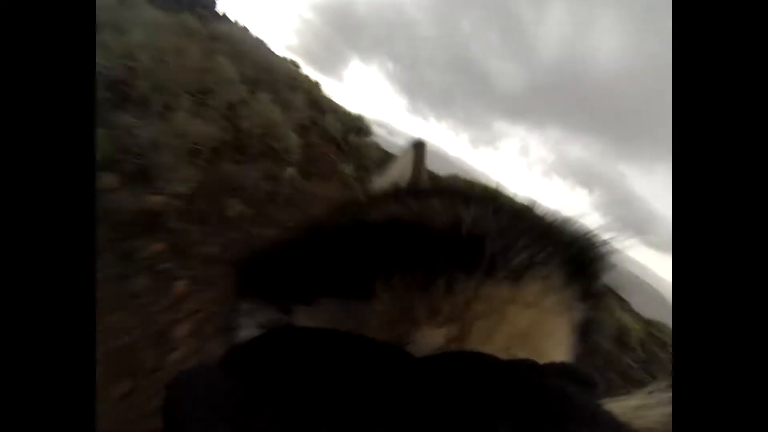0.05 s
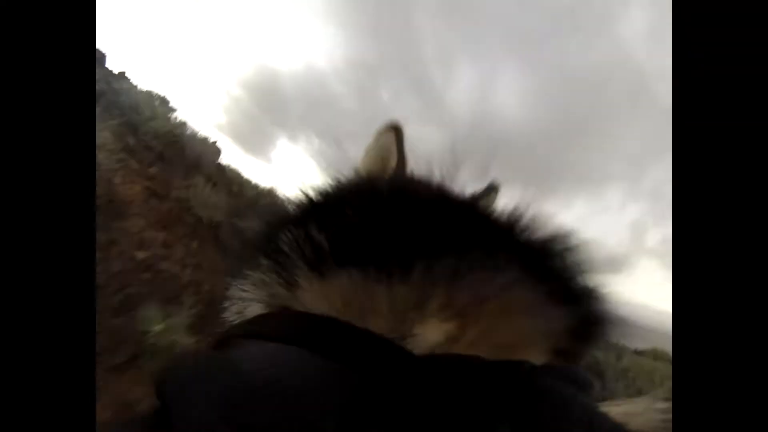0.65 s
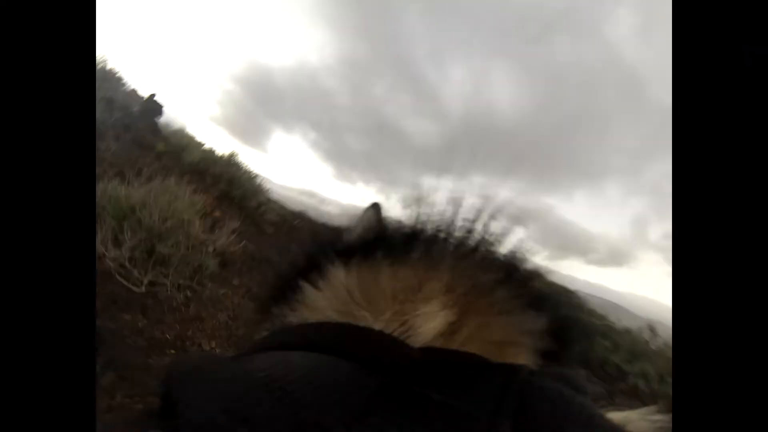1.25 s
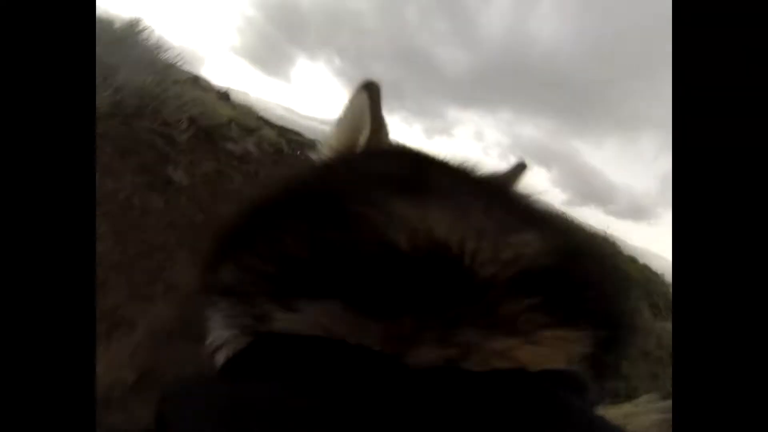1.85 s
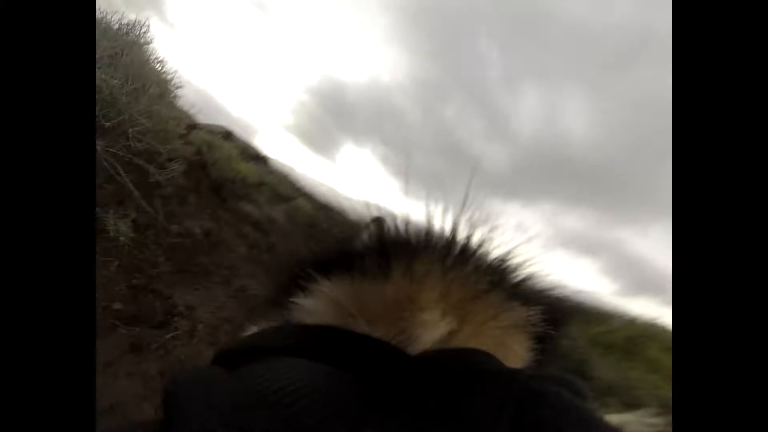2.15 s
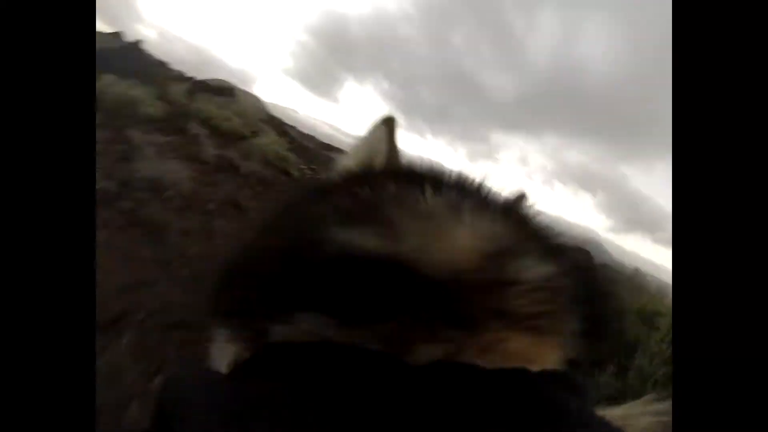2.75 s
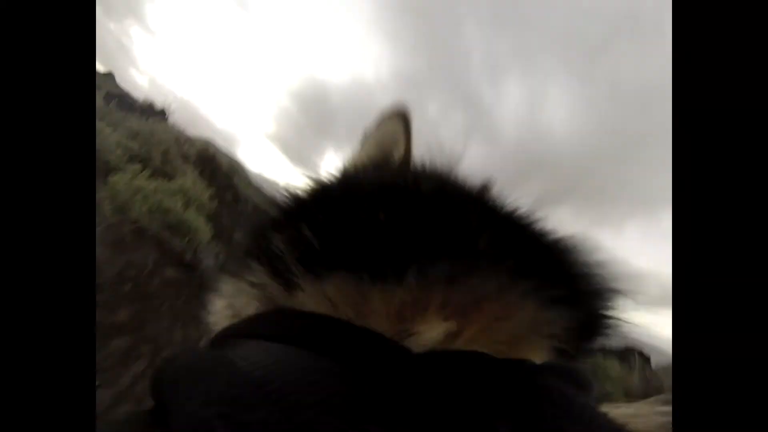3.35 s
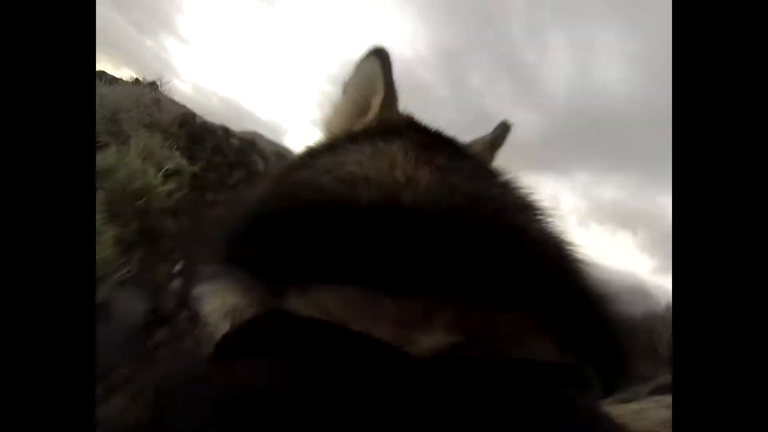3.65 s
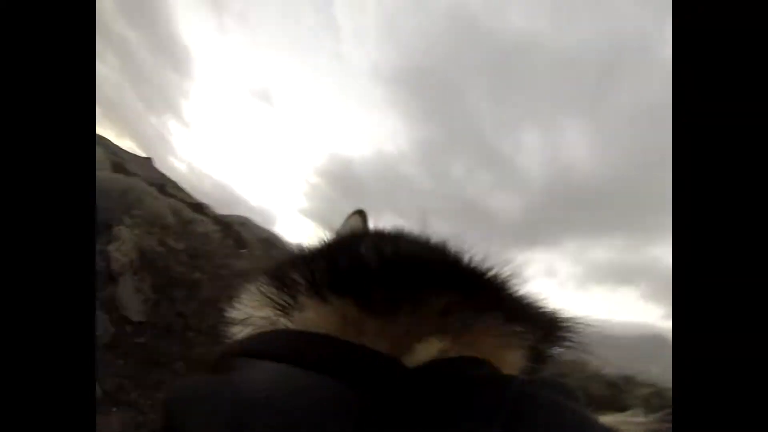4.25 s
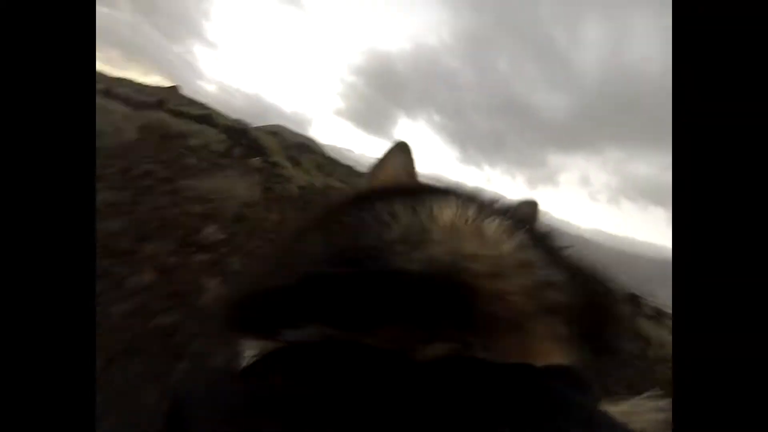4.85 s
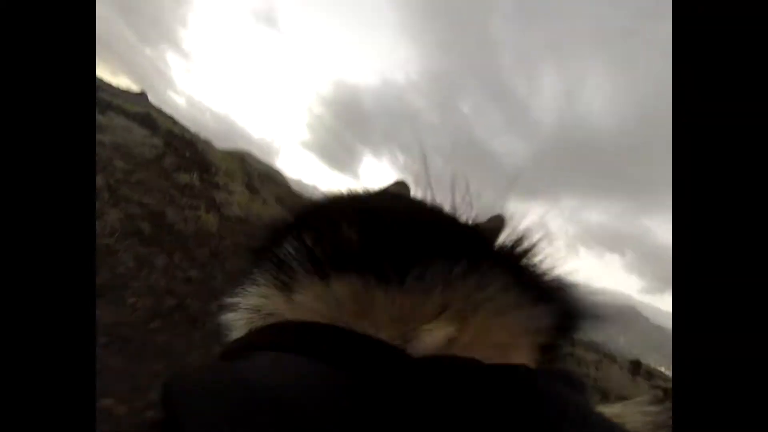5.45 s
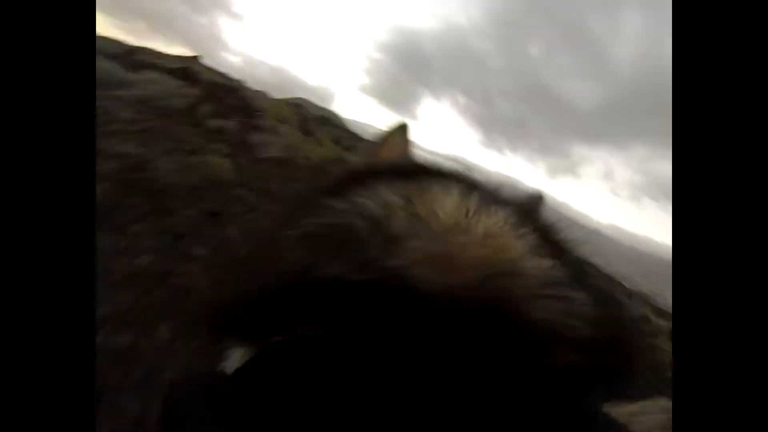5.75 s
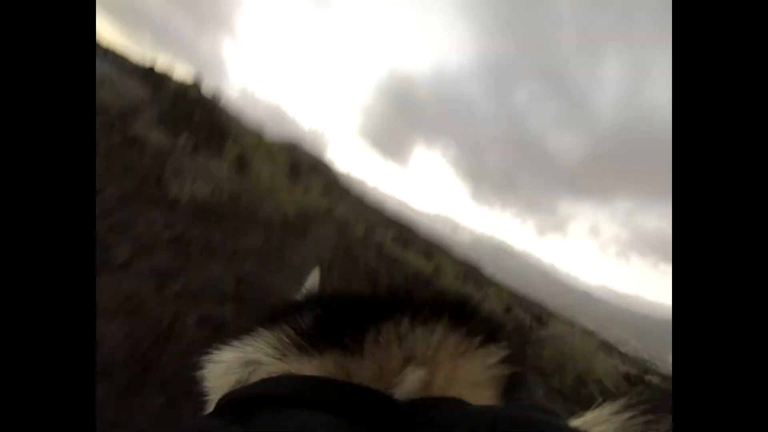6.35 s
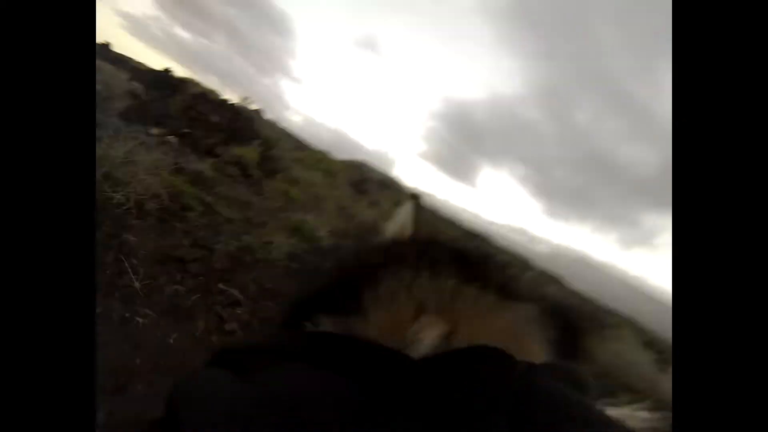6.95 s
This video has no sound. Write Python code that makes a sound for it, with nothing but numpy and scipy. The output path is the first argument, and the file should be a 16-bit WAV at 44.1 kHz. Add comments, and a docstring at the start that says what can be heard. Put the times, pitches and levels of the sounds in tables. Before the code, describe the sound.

Close, irregular plastic knocks and dull step thumps as a dog walks wearing a camera, its metal tag tinkling faintly over rumbling air.

```python
"""A dog walks a hill trail with a small camera strapped to its back, in a low rumble and a soft hiss.
From the first moment fur and straps rub, and the plastic case knocks and rattles right at the microphone.
A metal tag tinkles, steps thump through the harness, and near 1 s a hard blow rings a steel buckle.
Near 4 s the hardest knock overloads the microphone and the case scrapes along its mount.
Just after 6 s quick tugs snap a strap taut, and the walk goes on with lighter knocks."""
import sys
import numpy as np
from scipy import signal
from scipy.fft import rfft, irfft, next_fast_len
from scipy.io import wavfile
from scipy.ndimage import uniform_filter1d

SR = 44100
rng = np.random.default_rng(int(sys.argv[2]) if len(sys.argv) > 2 else 0)


def store_pcm(level_fs):
    """Save levels as 16-bit WAV."""
    pcm = np.round(np.clip(level_fs, -1, 1) * 32767).astype(np.int16)
    wavfile.write(sys.argv[1], SR, np.atleast_2d(pcm).T)


N = 317961

# knocks of the case in its mount: start_s, level_db, body_db (relative to level), cloth (0 bare, 1 padded)
CASE_KNOCKS = [(0.0584, -9, -5, 0.28), (0.159, -28.5, -3.5, 0.35), (0.2048, -32.5, -7.5, .95),
               (0.496, -17.5, -1.5, 0.31), (0.762, -43.5, -17, 1), (0.9584, -40.5, 5, 0.64),
               (0.9771, -8.5, -24, 0.09), (1.0683, -44.5, 1, 0.95), (1.1084, -42, -5, 1),
               (1.4154, -35.5, -8, 0.86), (1.6242, -31.5, -9.5, 0.51), (1.8016, -10, -8, 0.33),
               (1.926, -48.5, -10, 0.32), (2.0274, -31.5, -7, 0.72), (2.0633, -16.5, -6, 0.4),
               (2.1011, -30, -14, .75), (2.164, -50.5, 10.5, 1), (2.2654, -24, -13, 0.36),
               (2.3321, -34.5, -1.5, 0.39), (2.4993, -44.5, -3, .6), (2.563, -39.5, -7.5, 1),
               (2.712, -15, -4, 0.27), (2.9103, -43, -1.5, 0.7), (2.9807, -36.5, -9, 0.95),
               (3.163, -25.5, -14, 0.68), (3.1811, -13, -5, 0.24), (3.3508, -32.5, -5, 0.75),
               (3.4286, -45.5, 3.5, .85), (3.573, -38, -8.5, 0.59), (3.7465, -30.5, -4.5, 0.8),
               (3.9377, -1, -27.5, 0.17), (4.008, -12, -20, 0.08), (4.0278, -27.5, -17.5, 1),
               (4.045, -25.5, -22.5, 0.8), (4.062, -21, -19, .4), (4.0804, -30, -22, 0.72),
               (4.1917, -35, -1.5, 0.8), (4.4543, -34, -6, 0.75), (4.8273, -17, -7.5, 0.28),
               (4.8828, -38.5, -12, 0.58), (5.0288, -38, -3, .74), (5.094, -32, -3.5, 0.41),
               (5.2922, -12, -4, 0.29), (5.3125, -38.5, -4, 0.57), (5.4975, -37.5, -4, 0.98),
               (5.6768, -21.5, -9.5, 0.36), (5.7516, -33.5, -11.5, 0.74), (5.9216, -34, -3, 0.87),
               (5.9728, -31, -15.5, 0.25), (6.009, -30, -13.5, 0.84), (6.0309, -38, -9, 0.98),
               (6.183, -32.5, 0.5, 0.97), (6.3966, -27.5, -10, .7), (6.4243, -39, 9, 0.68),
               (6.6579, -39.5, -5, 0.77), (6.787, -26.5, -8.5, 0.27), (6.9575, -28.5, -7.5, 0.32),
               (6.994, -35, -7, 0.5), (7.0553, -33, -13.5, .73), (7.1322, -33, -5.5, 0),
               (7.1692, -41.5, -5.5, 0.34)]
# steps, each swaying the harness: centre_s, level_db, pitch_hz
DOG_STEPS = [(0.314, -24.5, 39), (.742, -25, 31.3), (1.174, -33, 34.5), (1.607, -22.5, 28.13),
             (2.098, -26.5, 25), (2.555, -25, 29.5), (2.956, -21, 27.83), (3.508, -23.5, 40.1),
             (3.879, -16, 34), (4.317, -14.5, 40.3), (4.67, -28, 30), (5.059, -34.5, 29.84),
             (5.529, -21, 30.2), (5.993, -25, 29.5), (6.144, -22.5, 35.4), (6.862, -22, 44.35)]


def undb(db):
    """Decibels to gain."""
    return 10 ** (np.asarray(db) / 20)


def add(track, start_s, sound):
    """Mix a sound into the track at a time."""
    i = max(int(start_s * SR), 0)
    track[i:i + len(sound)] += sound[:max(N - i, 0)]


def wander(rate_hz):
    """Smooth random modulation: held values, slewed twice, with a spread near 1."""
    hold = max(int(SR / rate_hz), 1)
    held = np.repeat(rng.standard_normal(N // hold + 1), hold)
    return 1.5 * uniform_filter1d(uniform_filter1d(held, hold), hold)[:N]


def colour(source, eq):
    """Shape a source with an EQ curve of (frequency_hz, gain_db) points, at rms 1."""
    hz, db = np.transpose(eq)
    size = next_fast_len(N)
    bins_hz = np.maximum(np.fft.rfftfreq(size, 1 / SR), 1)
    curve_db = np.interp(np.log(bins_hz), np.log(hz), db, right=-np.inf)
    shaped = irfft(rfft(source, size) * undb(curve_db), size)[:N]
    return shaped / np.std(shaped)


def swells(rubs):
    """Envelope of overlapping rubs (centre_s, level_db, half_length_s), each a smooth rise and fall."""
    power, t = np.zeros(N), np.arange(-SR // 5, SR // 5) / SR
    for centre_s, db, half_s in rubs:
        add(power, centre_s + t[0], undb(db) ** 2 * np.exp(-(t / half_s) ** 2))
    return np.sqrt(power)


def rings(modes, t, detune=0):
    """One decaying sine for each mode, as rows."""
    hz, db, t60 = np.transpose(modes)[:, :, None]
    hz = hz * (1 + detune * rng.standard_normal(hz.shape))
    return undb(db) * np.exp(-np.log(1000) * t / t60) * np.sin(2 * np.pi * hz * t)


def air(rumble_db=-44, gust_db=0.4, hiss_db=-63.5):
    """Moving air rumbles on the case; a steady hiss takes on its hollow colour."""
    # deep rumble of air on the case: frequency_hz, gain_db
    rumble_eq = [(10, -4.5), (25, 11.5), (45, -2), (70, -2), (120, -18.5), (300, -29.5), (600, -49.5),
                 (1000, -70.5)]
    # hollow hiss: frequency_hz, gain_db
    hiss_eq = [(300, -27.5), (800, -8.5), (1100, 2), (1500, 12), (1850, 2.5), (2300, 9.5), (3000, -11.5),
               (4500, -12), (7000, -32), (8500, -25), (12000, -33.5), (15000, -47.5)]
    rumble = colour(rng.standard_normal(N), rumble_eq) * undb(rumble_db + gust_db * wander(rate_hz=3.7))
    return rumble + colour(rng.standard_normal(N), hiss_eq) * undb(hiss_db)


def harness_rub(strap_rest_db=-60.5, fur_rest_db=-71, fur_trim_db=-1, grip_db=1.84, grain_db=3):
    """Straps grip and slip in a dull scuffle; hairs brush the case in fine grains; neither quite stops."""
    # dull strap friction: frequency_hz, gain_db
    strap_eq = [(50, -21), (90, 5), (160, 0.5), (300, -10), (450, -23), (800, -26), (1500, -37)]
    # fur on plastic: frequency_hz, gain_db
    fur_eq = [(500, -6.5), (1200, 8), (2300, 3), (3000, 0.5), (3800, -4), (5000, -7.5), (7000, -9),
              (8200, -14), (12000, -18.5), (15000, -33)]
    # the harness slides over the coat: centre_s, half_length_s, strap_db, fur_db (before the trim)
    slides = [(0.568, 0.076, -50, -70), (.96, 0.063, -47.5, -58.5), (1.1, .05, -52, -62.5),
              (1.244, 0.013, -60, -58), (2.316, 0.014, -34.5, -53), (3.2, 0.08, -49, -58.5),
              (3.54, 0.14, -52, -64), (3.748, 0.0064, -33, -55), (3.871, 0.014, -35.5, -49.5),
              (3.985, .028, -52.5, -43), (4.169, 0.068, -52, -59), (4.439, 0.02, -37.5, -57.5),
              (6.172, 0.034, -43.5, -53), (6.38, 0.061, -40, -55.5), (6.63, 0.059, -52, -63.5),
              (7.073, 0.083, -53.5, -65.5)]
    strap = colour(rng.standard_normal(N), strap_eq) * undb(grip_db * wander(rate_hz=90))
    fur = colour(rng.standard_normal(N) * undb(grain_db * wander(rate_hz=1500)), fur_eq)
    scuffles = [(start_s, -51.5, 0.014) for start_s, *_ in CASE_KNOCKS]  # each knock jerks the strap
    brushes = []
    for centre_s, db, _ in DOG_STEPS:
        effort_db = 0.49 * (db + 27)  # a step heavier than the usual -27 dB rubs harder
        scuffles.append((centre_s, -49 + effort_db, 0.025))
        brushes.append((centre_s, -63.5 + effort_db, 0.03))
    for centre_s, half_s, scuffle_db, brush_db in slides:
        scuffles.append((centre_s, scuffle_db, half_s))
        brushes.append((centre_s, brush_db, half_s))
    strap_gain = np.hypot(swells(scuffles), undb(strap_rest_db))
    fur_gain = np.hypot(undb(fur_trim_db) * swells(brushes), undb(fur_rest_db))
    return strap * strap_gain + fur * fur_gain


def case_knock(level_db, body_db, cloth, chatter_s=0.00029, shudder_s=0.005, shudder_hz=2500,
               muffle_db=18, damping_per_s=220, scatter_db=2):
    """A sharp blow and a brief chatter ring the body, shell, lid and edges of the case."""
    # modes of the plastic case: pitch_hz, level_db, t60_s
    case_modes = [(337, 10, 0.022), (560, -2, 0.0026), (896, -5.5, 0.0023), (1180, -3, 0.0099),
                  (1266.5, 0, 0.012), (1570.4, 1, 0.014), (1632, -4, 0.02), (1947, -7, 0.018),
                  (2110, 0, 0.011), (2365, 0.5, 0.013), (3163, -10, 0.015), (3700, -2.5, 0.018),
                  (4060, 1.5, 0.016), (4600, -1, 0.0094), (5143, 3.5, 0.012), (6025, 2.5, 0.0096),
                  (6960, -4, 0.0089), (9100, -9, 0.005), (11220, -13, .005), (13900, -13, 0.012),
                  (15500, -16.5, .004)]
    # borders of the body, shell, lid and edge bands: frequency_hz
    borders_hz = [0, 700, 1850, 3300, 20000]
    # centres of those four bands: frequency_hz
    centres_hz = [325, 1400, 2300, 6000]
    t, mode_hz = np.arange(SR // 20) / SR, np.array(case_modes)[:, 0]
    lid_db = 6.5 - 19 * cloth + 0.18 * body_db  # the lid rings along with the body
    edge_db = 0.5 - 37.5 * cloth
    padding = np.clip((-6 - edge_db) / 24, 0, 1)  # 0 = bare plastic, 1 = cloth in between
    contact = 0.26 * rng.standard_normal(len(t)) * np.exp(-t / chatter_s)
    contact[0] += 1  # the blow itself
    # the mount settles with a faint, dull shudder
    shudder = signal.sosfilt(signal.butter(1, shudder_hz, fs=SR, output="sos"), rng.standard_normal(len(t)))
    contact += 0.013 * shudder * (1 + 2 * padding) * np.exp(-t / shudder_s)
    # cloth lengthens the push, which takes off the top, and its load lowers and damps the ring
    top_hz = 15000 * undb(-muffle_db * padding)
    contact = signal.sosfilt(signal.butter(2, top_hz, fs=SR, output="sos"), contact)
    modes = rings(case_modes, t * (1 - 0.053 * padding), detune=0.03)
    modes *= np.exp(-damping_per_s * padding * t)
    # the point of contact decides how much each part of the case takes up
    tilt_db = np.interp(np.log(mode_hz), np.log(centres_hz), [body_db + 4.5, 0, lid_db, edge_db + 12])
    polarity = (-1) ** np.arange(len(mode_hz))  # neighbours start opposed, so the ring briefly swells
    gains = polarity * undb(tilt_db + scatter_db * rng.standard_normal(len(mode_hz)))
    out, part = 0, np.digitize(mode_hz, borders_hz) - 1
    for k, share_db in enumerate([body_db, 0, lid_db, edge_db]):
        ring = signal.fftconvolve((gains * (part == k)) @ modes, contact)[:len(t)]
        rms = np.sqrt(np.sum(ring ** 2) / (0.005 * SR))  # as if all its energy fell within 5 ms
        out = out + ring / rms * undb(level_db + share_db)
    return out


def case_rattle(slips=56, slip_db=-54, spread_db=3, cloth_per_bounce=0.033):
    """The case knocks and bounces to rest, sinking into the cloth, with tiny padded slips in between."""
    # runs of bounces: start_s, level_db, body_db (relative), cloth (0-1), bounces, gap_s, fade_db (each)
    bounce_runs = [(0.0701, -27.5, -0.5, 0.63, 2, 0.006, 8.5), (0.504, -20, -5.5, 0.31, 2, 0.0099, 11),
                   (0.5548, -43, -6, 0.51, 3, 0.013, 1), (1.8142, -32, -7.5, 0.51, 3, 0.0087, 2.5),
                   (2.274, -27, -8.5, 0.23, 2, 0.0062, 12), (2.2926, -27, -18, 0.19, 3, 0.0066, 2),
                   (2.7347, -21.5, -5, 0.25, 3, 0.011, 5.5), (3.2, -25.5, -6.5, 0.25, 3, 0.016, 7.5),
                   (3.9449, -17.5, -25, 0.4, 2, 0.015, 13.5), (5.6862, -34.5, -1, 0.3, 2, 0.0064, 11.5),
                   (7.0174, -33, -8, 0.41, 2, 0.0061, 2)]
    out = np.zeros(N)
    for start_s, db, body_db, cloth in CASE_KNOCKS:
        add(out, start_s, case_knock(db, body_db, cloth))
    for start_s, db, body_db, cloth, bounces, gap_s, fade_db in bounce_runs:
        for k in range(bounces):
            bounce = case_knock(db - k * fade_db, body_db, cloth + k * cloth_per_bounce)
            add(out, start_s + k * gap_s, bounce)
    for start_s in rng.random(slips) * N / SR:
        add(out, start_s, case_knock(slip_db + spread_db * rng.standard_normal(), body_db=-1, cloth=0.85))
    return out


def tag_clink(level_db, low_mode_db, scatter_db=3, tick_db=-14, tick_s=0.0013):
    """One touch of the metal tag: a tiny tick and a fresh mix of its modes."""
    # modes of the tag: pitch_hz, level_db, t60_s
    tag_modes = [(7600, -8, .06), (9315, -10, 0.11), (9490, -7.5, .08), (11050, -5, 0.043),
                 (13890, -14.5, .06)]
    t = np.arange(SR // 5) / SR
    gains = undb(scatter_db * rng.standard_normal(len(tag_modes)))
    gains[0] *= undb(low_mode_db)
    tick = undb(tick_db) * np.exp(-t / tick_s) * rng.standard_normal(len(t))
    return undb(level_db) * (gains @ rings(tag_modes, t) + tick)


def tag_tinkle(touches=6, jiggles=32, jiggle_db=-73, spread_db=3):
    """The tag clinks, shivers and jiggles faintly on its ring."""
    # clear clinks: start_s, level_db, low_mode_db (trim on the lowest mode)
    clinks = [(.161, -55.5, -20), (0.967, -42, 12), (2.002, -49.5, -24.5), (2.29, -58, -4),
              (2.699, -49.5, -9), (3.103, -49, -4), (3.555, -46, -5), (3.887, -50, -6), (4.159, -56, 9),
              (4.969, -61.5, -12), (5.28, -47.5, -9.5), (6.745, -49.5, 1.5)]
    # spells of shivering: start_s, length_s, touch_db
    shivers = [(.82, 0.13, -53.5), (1.102, 0.4, -66.5), (2.332, 0.1, -65), (4.201, .5, -67),
               (6.416, 0.38, -65), (7.019, 0.31, -60.5)]
    out = np.zeros(N)
    for start_s, db, low_mode_db in clinks:
        add(out, start_s, tag_clink(db, low_mode_db))
    for start_s, length_s, db in shivers:
        for place in (np.arange(touches) + rng.random(touches)) / touches:
            add(out, start_s + place * length_s, tag_clink(db, low_mode_db=-6))
    for start_s in rng.random(jiggles) * N / SR:
        add(out, start_s, tag_clink(jiggle_db + spread_db * rng.standard_normal(), low_mode_db=-7))
    return out


def harness_thumps(width_cycles=0.35):
    """Each step or tug pushes the air at the microphone and draws it back."""
    # quick tugs that snap a strap taut: centre_s, level_db, pitch_hz
    tugs = [(1.876, -31.5, 172), (6.171, -31, 239), (6.182, -22, 166), (6.364, -21.5, 90),
            (6.387, -31, 58.3), (6.429, -18.5, 130), (6.436, -19.5, 69.2)]
    out, t = np.zeros(N), np.arange(-SR // 10, SR // 10) / SR
    for centre_s, db, hz in DOG_STEPS + tugs:
        envelope = np.exp(-(hz * t / width_cycles) ** 2 / 2)
        add(out, centre_s + t[0], -undb(db) * np.sin(2 * np.pi * hz * t) * envelope)
    return out


def buckle_ring(low_cut_hz=900):
    """Hard blows ring a steel buckle, too small to give off any bass."""
    # modes of the buckle: pitch_hz, level_db, t60_s
    buckle_modes = [(2480, 32, 0.0076), (2970, -2, 0.027), (4450, -3, 0.05), (7290, -6.5, 0.033),
                    (9500, -14.5, 0.06)]
    # blows on the buckle: start_s, gain_db
    blows = [(0.9776, -25), (3.9383, -34.5), (5.2925, -32)]
    out, t = np.zeros(N), np.arange(SR // 5) / SR
    low_cut = signal.butter(2, low_cut_hz, "high", fs=SR, output="sos")
    ring = signal.sosfilt(low_cut, rings(buckle_modes, t).sum(0))
    for start_s, db in blows:
        add(out, start_s, undb(db) * ring)
    return out


def mount_scrape(grain_db=6.5, catches_per_s=900):
    """Plastic catches and slips on plastic in a dense, bright rasp."""
    # the case scrapes along its mount: centre_s, level_db, half_length_s
    scrapes = [(2.3, -39, 0.0056), (3.225, -49, 0.019), (3.972, -24, .002), (3.984, -37.5, 0.0097),
               (4.016, -42.5, .005), (4.05, -30.5, 0.0033)]
    # bright plastic rasp: frequency_hz, gain_db
    rasp_eq = [(800, -17.5), (1500, -6), (2600, -10), (3600, 2), (4700, -9.5), (6300, -13.5), (9000, -24),
               (15000, -39)]
    catches = rng.standard_normal(N) * undb(grain_db * wander(catches_per_s))
    return colour(catches, rasp_eq) * swells(scrapes)


def scene():
    """Everything as it reaches the one microphone; open ground gives no echo."""
    mix = case_rattle() + mount_scrape() + harness_thumps() + tag_tinkle() + buckle_ring()
    return (mix + harness_rub() + air())[None]


def record(dry, ceiling=0.93, top_hz=15900):
    """The camera clips the hardest knocks and cuts the top."""
    high_cut = signal.ellip(8, 0.1, 50, top_hz, fs=SR, output="sos")
    return signal.sosfiltfilt(high_cut, np.clip(dry, -ceiling, ceiling))


dry = scene()
out = record(dry)
store_pcm(out)
```